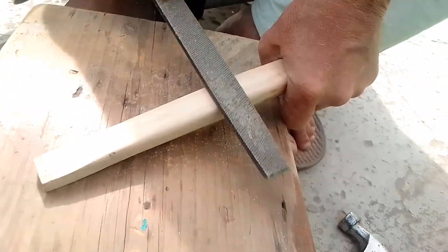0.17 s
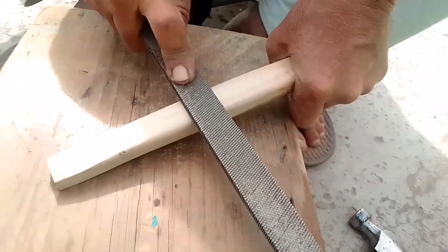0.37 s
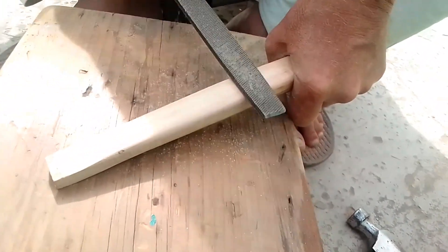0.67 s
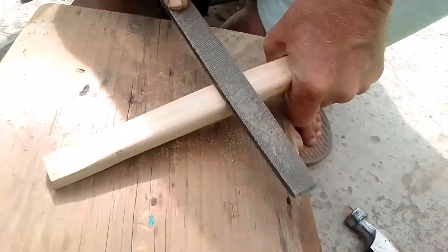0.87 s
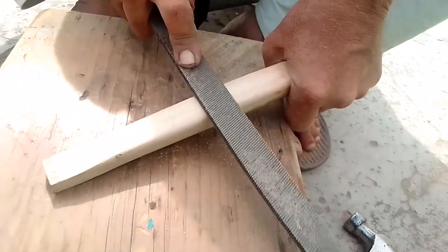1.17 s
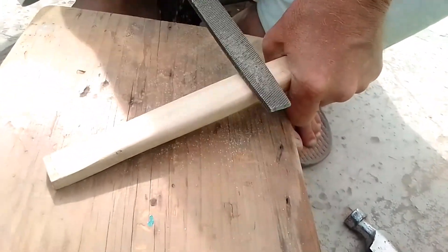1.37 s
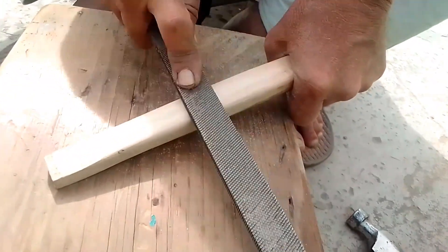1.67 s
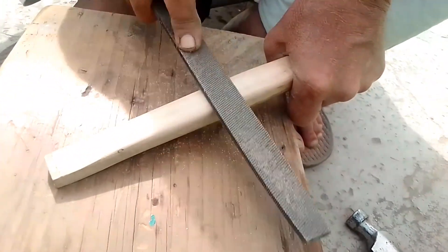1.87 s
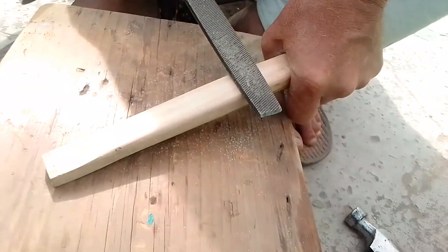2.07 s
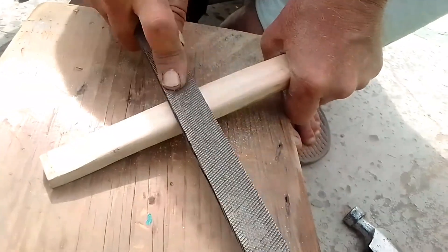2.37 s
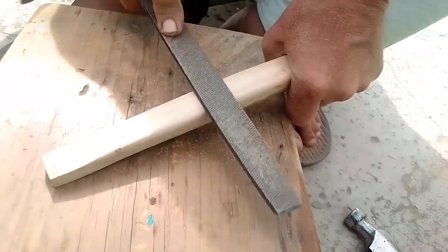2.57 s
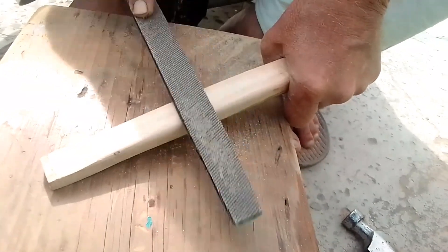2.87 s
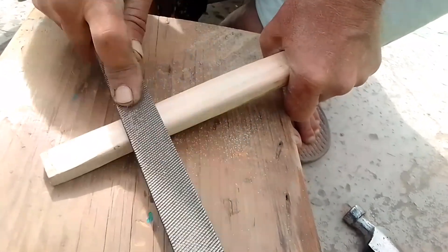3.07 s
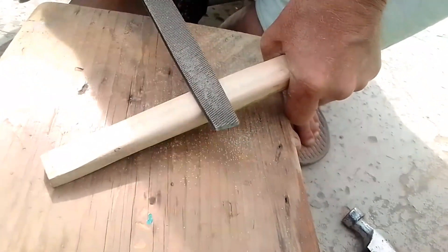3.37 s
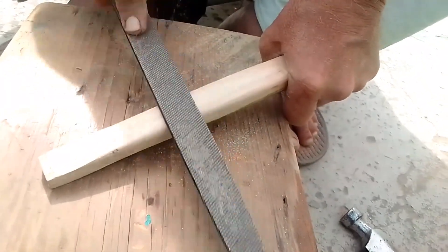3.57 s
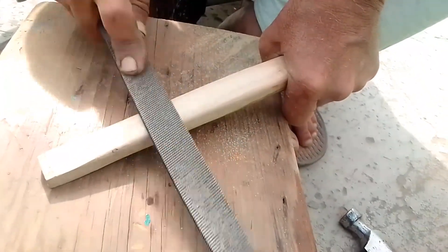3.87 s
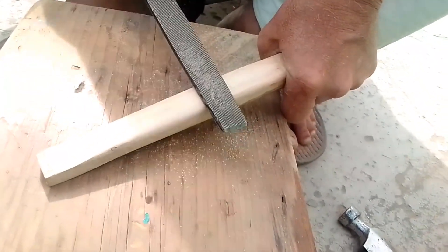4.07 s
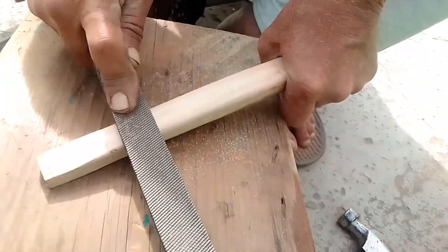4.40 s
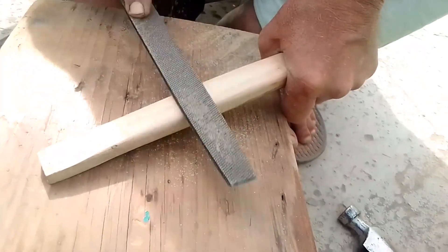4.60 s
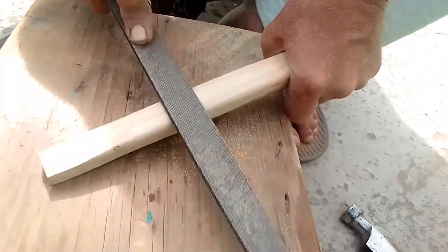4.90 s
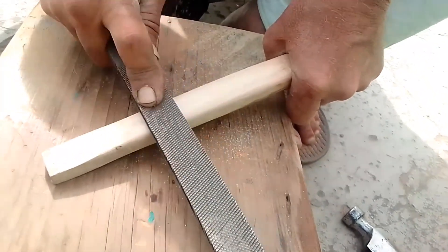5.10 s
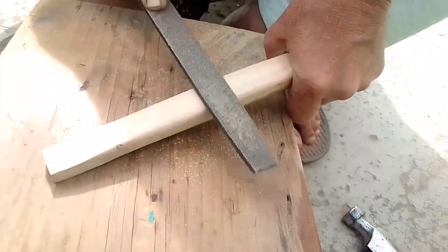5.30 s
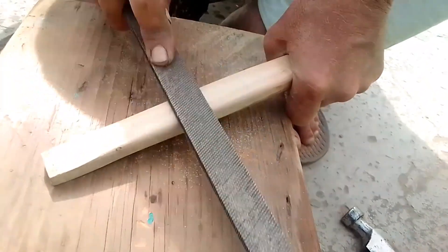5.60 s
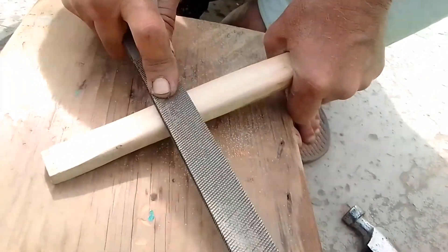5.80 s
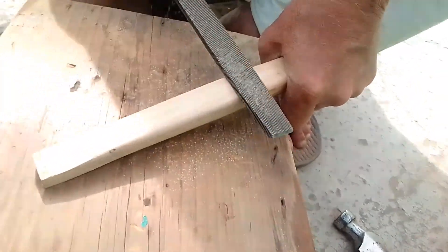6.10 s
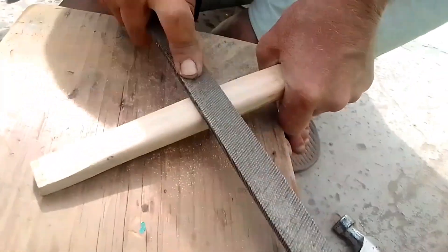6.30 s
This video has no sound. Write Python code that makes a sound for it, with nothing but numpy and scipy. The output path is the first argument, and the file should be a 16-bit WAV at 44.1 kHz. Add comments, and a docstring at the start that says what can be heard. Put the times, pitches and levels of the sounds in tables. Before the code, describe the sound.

A coarse steel file rasps across a wooden stick on a plank bench, close to the microphone, from the very start until about 6.5 seconds. It moves back and forth in a quick, even rhythm, around twenty strokes in all, each lasting roughly a third of a second. Every stroke swells and eases, with a brief dip as the file turns around. The sound is dry and gritty: crackling wood fibres, a slight tooth buzz rising and falling in pitch, a hollow wooden resonance and a thin metallic hiss. Push and pull differ a little in tone, and the rasp grows slightly stronger from about 3 seconds. The treble is somewhat dull and there is almost no echo. Far beneath the filing lie soft outdoor air and a barely audible distant rumble, with one tiny, very faint bird chirp at about 1.2 seconds.

```python
"""A coarse steel file rasps to and fro across a wooden stick on a plank bench, close by, out of doors.
Rows of teeth catch at a rate that rises and falls with each stroke, and torn fibres crackle between
them. Both set the stick and the bench ringing; the crackle also rings the blade. A small microphone
dulls the treble. Behind the work lie open air, a far rumble and one faint bird."""
import sys
import numpy as np
from scipy import signal
from scipy.fft import rfft, irfft, next_fast_len
from scipy.io import wavfile
from scipy.ndimage import uniform_filter1d

SR = 44100
rng = np.random.default_rng(int(sys.argv[2]) if len(sys.argv) > 2 else 0)


def to_wav(sig):
    """Store sig (one row per channel, or 1-D mono) as 16-bit WAV at the path in sys.argv[1].

    Samples outside -1..1 are clipped; the rate is SR.
    """
    pcm = np.clip(np.atleast_2d(sig), -1, 1) * 32767
    pcm = np.round(pcm).astype(np.int16)
    wavfile.write(sys.argv[1], SR, pcm.T)  # frames by channels


N = 284445


def from_db(db):
    return 10 ** (np.asarray(db) / 20)


def rms_one(x):
    return x / np.sqrt(np.mean(x ** 2) + 1e-20)


def filtered(x, order, hz, kind="low"):
    return signal.sosfilt(signal.butter(order, hz, kind, fs=SR, output="sos"), x)


def in_time(rows):
    """Rows that begin with a time become curves, one value a sample."""
    seconds, *columns = np.transpose(rows)
    return [np.interp(np.arange(N) / SR, seconds, column) for column in columns]


def drift(hz):
    """Slow random wander with a spread of 1."""
    pole = np.exp(-80 * np.pi * hz / SR)
    slow = signal.lfilter([1], [1, -2 * pole, pole * pole], rng.standard_normal(N // 40 + 2002))[2000:]
    return np.interp(np.arange(N) / 40, np.arange(len(slow)), rms_one(slow - slow.mean()))


def coloured(x, spectrum):
    """Shapes x by a spectrum, then scales it to rms 1."""
    size = next_fast_len(N)
    hz, level_db = np.transpose(spectrum)
    bin_hz = np.arange(size // 2 + 1) * SR / size
    gain = from_db(np.interp(np.log(bin_hz + 1), np.log(hz), level_db, -90, -90))
    return rms_one(irfft(rfft(x, size) * gain, size)[:N])


def arch(share, top):
    """Half a sine over a stroke, leaning so that it peaks at the share top."""
    return np.abs(np.sin(np.pi * share ** (np.log(.5) / np.log(top))))


# The hand at the bench, pull and push in turn. Each row: start and end in seconds, shares of the stroke
# where it bears hardest and moves fastest, top tooth rows per second, relative hum in dB, drive of
# blade, bench and stick at full effort in dB, dB gained over the stroke by bench and stick, mean blade
# brightness and its swing in dB per octave, sizzle in dB against the blade.
FILE_STROKES = [(-.063, .22, 0.32, .48, 735, 3, -30.5, -38.5, -28.5, 9, 11.5, 4.5, 10, -32.5),
                (.215, .544, 0.48, 0.44, 710, 1, -28, -34.5, -37.5, -5, -13, 12.5, -3, -33.5),
                (.595, .882, .44, 0.46, 700, 5, -29, -38.5, -30.5, -3.5, 5.5, 2, 12, -35),
                (.88, 1.221, 0.47, 0.45, 713, 7.5, -26.5, -34.5, -38, -4, -11, 10, -4, -33),
                (1.267, 1.546, 0.45, .54, 800, 2.5, -30, -38, -31, 7, 10, 3, 9, -35),
                (1.531, 1.891, 0.48, 0.45, 715, 7, -28.5, -33.5, -38, 0, -12, 10.5, -3.5, -31.5),
                (1.92, 2.219, .45, 0.58, 850, 1.5, -31, -32, -31, 7, 9, 4, 11.5, -34),
                (2.201, 2.573, 0.5, 0.49, 683, 4.5, -29, -30.5, -39, -10, -10, 12.5, -7.5, -31.5),
                (2.597, 2.896, 0.44, 0.47, 763, 4, -29.5, -36.5, -32.5, 9, 9.5, -3.5, 6.5, -36),
                (2.882, 3.267, 0.48, 0.39, 664, 6, -26, -33.5, -39, -4, -4, 3, 0.7, -35),
                (3.267, 3.567, 0.49, 0.48, 647, -8.5, -27.5, -36, -35, 6, 10.5, -3, .5, -38),
                (3.56, 3.946, 0.43, 0.41, 647, -3, -26, -33, -40.5, -9, -4, 2, 1.5, -36),
                (3.943, 4.232, 0.47, .54, 800, 3, -26.5, -37, -38.5, 3, 15, -4.5, -0.5, -38.5),
                (4.225, 4.576, 0.46, .45, 730, 6, -25.5, -33.5, -40, -3, -6, -0.5, 1, -37.5),
                (4.588, 4.885, 0.47, .52, 794, 10.5, -26, -40, -37, -5, 16.5, -9, 2, -39.5),
                (4.893, 5.24, .46, 0.41, 737, 7, -25, -36, -42.5, -4.5, -5, 0.5, 4, -37.5),
                (5.275, 5.575, .47, 0.56, 783, 2.5, -27, -41, -35, 3.5, 16, -6.5, 3.5, -38),
                (5.573, 5.897, 0.44, 0.43, 830, -1, -27, -34.5, -41, -5.5, -10, 1.7, 0, -34),
                (5.951, 6.244, 0.41, 0.54, 710, 10.5, -29.5, -45, -34, 25, 18, 3, 11.5, -35.5),
                (6.248, 6.609, .51, 0.43, 680, 9.5, -23, -36, -40, -15, -16, 1.5, 2, -35)]
# Each row, pull then push: the powers of effort that drive blade, bench and stick.
EFFORT_EXPONENTS = [(1.9, 1.07, 1.33), (2.2, 0.96, 1.4)]
# Brief swells and dips in the ring of blade, bench and stick. Each row: time in seconds, then the dB
# gained by each of the three.
RASP_SWELLS = [(.13, 1, 4.5, 3.5), (.312, -3, 9.5, -2.5), (.404, 4.5, 0, 3.5), (.69, 2, -5.5, .1),
               (0.812, -0.5, 5.5, 11), (0.958, -3, 7, 2), (1.105, 1.5, 3.5, 2), (1.335, 0.5, -1, 7.5),
               (1.42, 0, .1, 2), (1.634, 2, 7, 4), (1.77, 3.5, -3, -1), (2.02, 2.5, -1.5, 7),
               (2.149, 2, 6.5, 6), (2.31, -3.5, 2.5, 2.5), (2.452, 3, 5, 0), (2.7, 3, -2, 3.5),
               (3.002, 0, 10.5, -4), (3.096, 2.5, 11, 6), (3.4, 2.5, 1, 1.5), (3.474, -0.5, 10.5, 3.5),
               (3.651, 0, 10, 4.5), (3.767, 0, 6, 6), (4.066, 4.5, 1, 6), (4.172, 1.5, 1.5, 11.5),
               (4.327, 1, 7.5, -5), (4.405, 3.5, 0.5, 5), (4.7, 4, -9, 3), (4.82, 1.5, -2.5, 4),
               (4.975, 0, 6, -4), (5.057, 2, -5, 9), (5.167, 0.5, 5.5, 8), (5.394, 5, -4.5, 6.5),
               (5.737, 7, 10.5, 9), (5.795, 5, 10, 5), (6.05, 3.5, -6, 7.5), (6.341, 4.5, -4.5, 4.5),
               (6.399, 0.5, 4, 7)]


def strokes():
    """Each stroke speeds up and slows, bears down and eases, as the contact slides along the blade."""
    silent_db, swell_s = -95.0, 0.012
    swing_at, swing_over = 0.46, 0.057   # shares of the stroke
    t, push = np.arange(N) / SR, np.zeros(N, bool)
    tooth_hz, hum, hiss_db, place, bright_db = np.zeros((5, N))
    drive_db = np.full((3, N), silent_db)
    for k, (start, end, hardest, fastest, top_hz, hum_db, *top_db,
            bench_gain_db, stick_gain_db, mean_db, swing_db, sizzle_db) in enumerate(FILE_STROKES):
        now = t >= start
        share = np.clip((t[now] - start) / (end - start), 0, 1)
        speed, effort = arch(share, fastest), arch(share, hardest)
        tooth_hz[now], hum[now] = top_hz * speed, from_db(hum_db) * speed
        hiss_db[now], push[now] = sizzle_db, k % 2
        place[now] = np.cos(np.pi * share) / 2 * (-1) ** k   # -.5 at the tip, .5 at the heel
        bright_db[now] = mean_db + swing_db * np.tanh((share - swing_at) / swing_over)
        effort_db = np.outer(EFFORT_EXPONENTS[k % 2], 20 * np.log10(effort + 1e-9))
        ramp_db = np.outer([0, bench_gain_db, stick_gain_db], share - .5)
        drive_db[:, now] = np.maximum(np.c_[top_db] + effort_db + ramp_db, drive_db[:, now])
    for at_s, *gained_db in RASP_SWELLS:
        drive_db += np.outer(gained_db, np.exp(-.5 * ((t - at_s) / swell_s) ** 2))
    return tooth_hz, hum, hiss_db, push, place, bright_db, drive_db


def fibres(rows_passed, snaps_per_s=6000, spread_db=1.5, bunching=.4):
    """Fibres tear in dense uneven snaps, bunched where a row of teeth bites."""
    sizes = from_db(spread_db * np.minimum(rng.exponential(1, N), 4)) * rng.choice([-1, 1], N)
    torn = rng.random(N) < snaps_per_s / SR * (1 + bunching * np.cos(2 * np.pi * rows_passed))
    return rms_one(sizes * torn * from_db(0.46 * drift(27)))


def teeth(rows_passed, push):
    """The tooth rows push the wood in a rounded, wavering pulse; a finer cross cut adds its own tone."""
    cross_cut = (1.45, np.where(push, -15, -5.5))   # multiple of the tooth rate, dB
    return sum(from_db(db + 3.0 * drift(18)) * np.sin(2 * np.pi * k * rows_passed + .5 * k * drift(35))
               for k, db in [(1, 0), (2, -6), (3, -13), cross_cut])


def resonance(x, hz, width_hz):
    """One ringing mode: a two-pole peak of height 1."""
    r = np.exp(-np.pi * width_hz / SR)
    poles = [1, -2 * r * np.cos(2 * np.pi * hz / SR), r * r]
    return signal.lfilter([(1 - r * r) / 2, 0, (r * r - 1) / 2], poles, x)


def body(force, modes, push, place, wander_db, bright_db=0):
    """Modes ring together; each one's share follows the contact point and wanders with the grain."""
    hz, width_hz, pull_db, push_db, slide_db = np.transpose(modes)
    pull_power, push_power = [np.sum(from_db(2 * db) * np.pi * width_hz / SR)
                              for db in (pull_db, push_db)]
    force = force / np.sqrt(np.where(push, push_power, pull_power))
    out = 0
    for k in range(len(hz)):
        share_db = np.where(push, push_db[k], pull_db[k]) + slide_db[k] * place + wander_db * drift(9.86)
        tilt_db = bright_db * np.log2(hz[k] / 3100)   # sharper snaps reach the higher modes
        out = out + (-1) ** k * resonance(force * from_db(share_db + tilt_db), hz[k], width_hz[k])
    return out


# The plank under the work. Each row: a mode's pitch and width in Hz, relative level in dB on the pull
# and on the push, dB gained as the contact slides from tip to heel.
BENCH_MODES = [(235.7, 41.5, -12, -16, 4.3), (291.6, 33.5, -4, -8.5, 3), (383, 41, -8, -9.5, 9.5),
               (490.6, 96, -2.5, -4.5, -9.5), (582.3, 74, 3.5, 5.5, 0), (651, 55, -2.5, -5, -4)]


def bench(force, snaps, drive_db, push, place):
    """The plank rings low; its three lowest modes follow the hand's pressure, brief swells smoothed."""
    upper = body(force * from_db(drive_db), BENCH_MODES[3:], push, place, wander_db=1.92)
    steady_db = uniform_filter1d(drive_db, size=3000)
    return upper + body(snaps * from_db(steady_db - 8.0), BENCH_MODES[:3], push, place, wander_db=4.0)


# The stick under the file. Each row: a mode, as for the bench.
STICK_MODES = [(839.3, 40.3, 0, 2, -6.5), (947, 71, -2.5, -9.5, -1), (1065.6, 57.4, -1.5, 3, 5.5),
               (1182, 171, -5, -6, 1.5), (1320, 490, -14, -3.5, -2.5), (1537, 42, -0.5, 1, 0.5)]


def stick(force, drive_db, push, place):
    """Teeth and snaps ring the stick in the midrange."""
    return body(force * from_db(drive_db), STICK_MODES, push, place, wander_db=2.3)


def tooth_hum(pulse, bench_db, stick_db):
    """The pulse of the teeth also leaves the wood between its modes."""
    low = filtered(from_db(bench_db - 7.5) * pulse, 2, 900)
    return low + filtered(from_db(stick_db - 9.5) * pulse, 2, [850, 1700], "band")


# The steel of the file. Each row: a mode, as for the bench.
BLADE_MODES = [(1810, 67, -40, -31.5, -6.5), (2039, 68, -24, -7.5, 15.5), (2345, 113, -10.5, -13, 4.5),
               (2670, 153, -3.5, -8.5, -3.5), (2889, 85, 2, 3, 0.5), (3147, 191, -3.5, -1.5, 4.8),
               (3447, 80, 0.5, -2.5, 3), (3683, 174, -9, -8.5, 10), (4039, 140, -5, -7, 1.5),
               (4390, 100, -14.5, -13.5, -0.5), (4603, 98, -7.5, -12, 1), (4765, 300, -15, -19.5, 3),
               (5396, 175, -20.5, -30, 4.5)]


def blade(snaps, drive_db, push, place, bright_db):
    """The snaps ring the steel, its brightness swinging near mid-stroke."""
    return body(snaps * from_db(drive_db), BLADE_MODES, push, place, wander_db=2.0, bright_db=bright_db)


# The blade's thin hiss, heard close. Each row: frequency in Hz, relative level in dB.
SIZZLE_SPECTRUM = [(5200, -34.5), (5800, 3), (6900, 8.5), (7500, -9), (9000, -7.5), (11000, -6.5),
                   (13500, -7), (15600, -5)]
# Its highest ringing. Each row: a mode, as for the bench.
SIZZLE_MODES = [(6700, 310, 3.5, 7, .1), (8440, 200, -3.5, -7, .1), (8900, 250, -8.5, -6, .1),
                (10400, 210, -4.5, -2, .1), (12200, 300, -8, -7.5, .1), (13300, 460, -11.5, -6, .1),
                (14550, 300, -4, 0, .1)]


def sizzle(snaps, drive_db, push, place):
    """The top of the crackle hisses off the blade and rings its high modes."""
    hiss = coloured(snaps, SIZZLE_SPECTRUM) * from_db(drive_db + drift(12))
    ringing = body(snaps * from_db(drive_db - 9.5), SIZZLE_MODES, push, place, wander_db=5.0)
    return hiss + filtered(ringing, 4, 6200, "high")


def filing():
    """Fibres and teeth sound through wood and steel, near the microphone."""
    tooth_hz, hum, hiss_db, push, place, bright_db, (blade_db, bench_db, stick_db) = strokes()
    rows_passed = np.cumsum(tooth_hz * (1 + .008 * drift(25))) / SR
    snaps = fibres(rows_passed)
    pulse = hum * teeth(rows_passed, push)
    force = snaps + from_db(-18.5) * pulse
    rasp = bench(force, snaps, bench_db, push, place)
    rasp += stick(force, stick_db, push, place)
    rasp += tooth_hum(pulse, bench_db, stick_db)
    rasp += blade(snaps, blade_db, push, place, bright_db)
    rasp = filtered(rasp, 9, 205, "high")   # the plank is too small for bass
    rasp = filtered(rasp, 10, 5400)   # the microphone port rolls off steeply
    return rasp + sizzle(snaps, blade_db + hiss_db, push, place)


# Open air all round, with the microphone's hiss. Each row: frequency in Hz, relative level in dB.
AIR_SPECTRUM = [(20, -22.5), (60, -24), (160, -28.5), (300, -1.5), (600, -10.5), (950, -16), (1800, -25),
                (2900, -13), (4200, -8.5), (5400, -33.5), (7000, -38.5), (10000, -36), (15000, -29.5),
                (16000, -33)]


def air(level_db=-58.5):
    """A soft, slightly wavering bed of noise."""
    return from_db(level_db + 0.75 * drift(1.7)) * coloured(rng.standard_normal(N), AIR_SPECTRUM)


# Far from the bench. Each row: time in seconds, level in dB.
RUMBLE_LEVELS = [(0.0, -76), (0.55, -82.5), (0.7, -72.5), (2.17, -78.5), (3.48, -70.5), (4.58, -77),
                 (6.02, -75), (6.45, -69)]


def rumble():
    """A distant band of low noise swells and sinks."""
    low = filtered(rng.standard_normal(N), 3, [60, 125], "band")
    return from_db(in_time(RUMBLE_LEVELS)[0] + 2.0 * drift(3.5)) * rms_one(low)


# A bird a long way off. Each row: time in seconds, pitch in Hz, level in dB.
BIRD_CHIRP = [(1.19, 4327, -90), (1.22, 4253, -55), (1.27, 4312, -75), (1.3, 4400, -88.5)]


def bird():
    """One faint whistle dips and rises in pitch."""
    hz, level_db = in_time(BIRD_CHIRP)
    return from_db(level_db) * np.sin(2 * np.pi * np.cumsum(hz) / SR)


# Ground and wall, within a few metres. Each row: delay in seconds, level in dB against the filing.
REFLECTIONS = [(.0067, -18), (.0127, -20), (.023, -23), (.041, -27)]


def scene():
    """The close filing and its echoes, over air, rumble and bird."""
    near = filing()
    out = near + air() + rumble() + bird()
    for delay_s, db in REFLECTIONS:
        lag = round(delay_s * SR)
        out[lag:] += from_db(db) * near[:-lag]
    return out[None]


def record(dry, cutoff_hz=15450):
    """One microphone channel, its very top cut steeply."""
    return signal.sosfilt(signal.ellip(12, .5, 70, cutoff_hz, fs=SR, output="sos"), dry)


dry = scene()
out = record(dry)
to_wav(out)
```